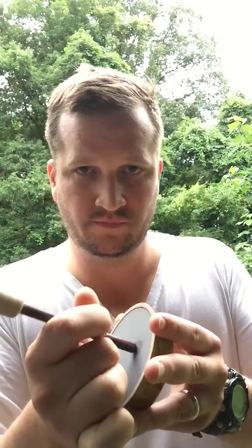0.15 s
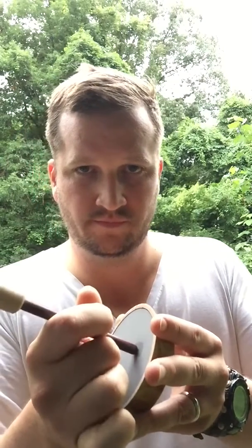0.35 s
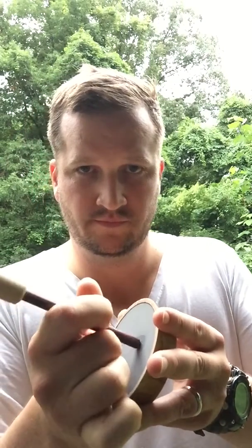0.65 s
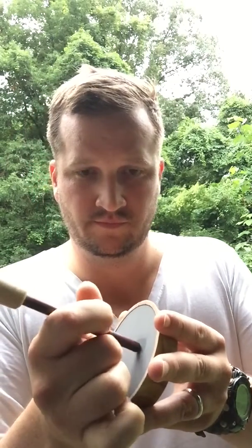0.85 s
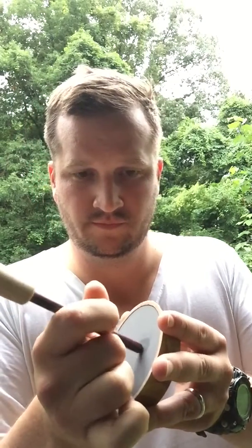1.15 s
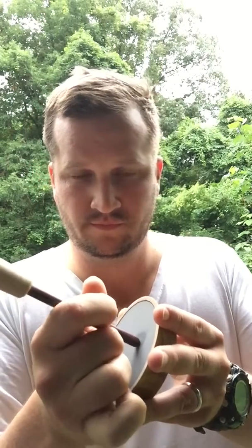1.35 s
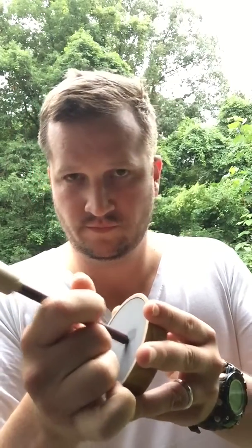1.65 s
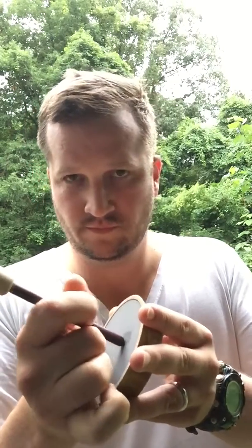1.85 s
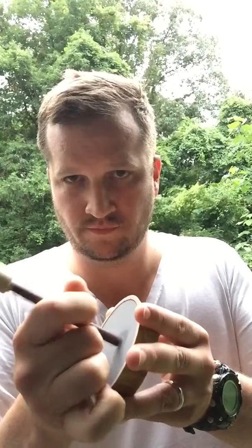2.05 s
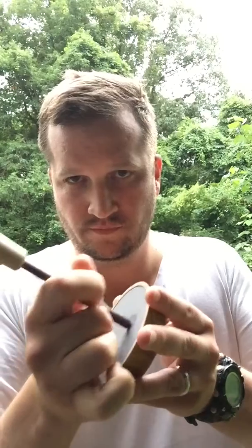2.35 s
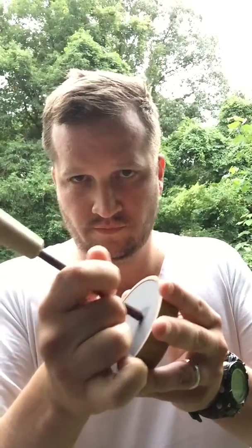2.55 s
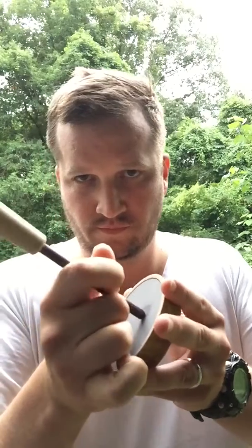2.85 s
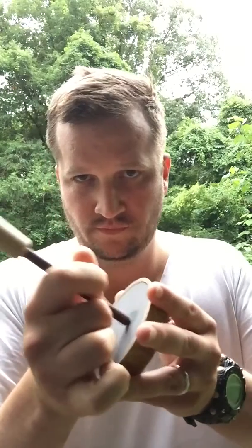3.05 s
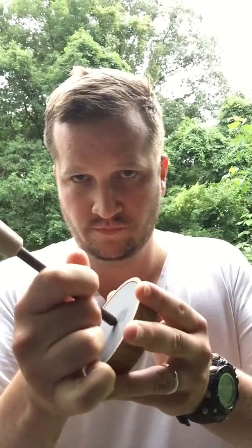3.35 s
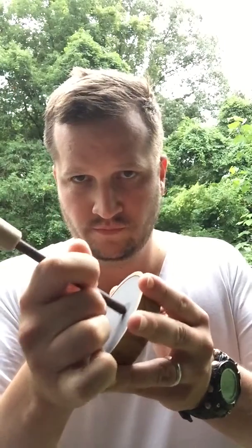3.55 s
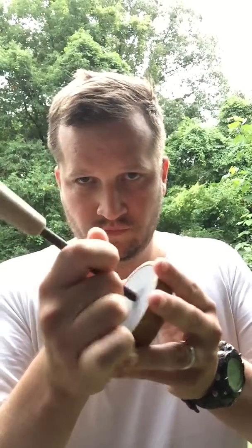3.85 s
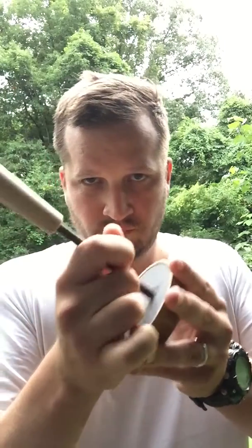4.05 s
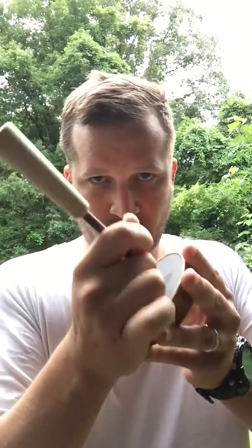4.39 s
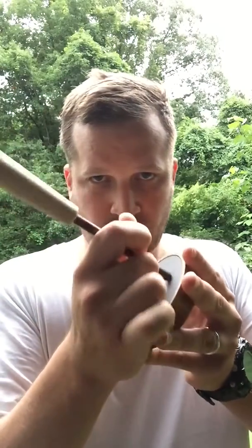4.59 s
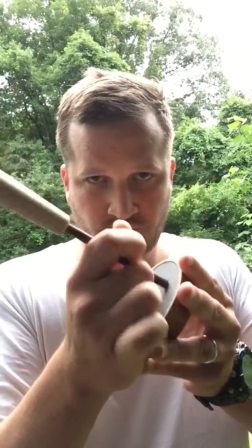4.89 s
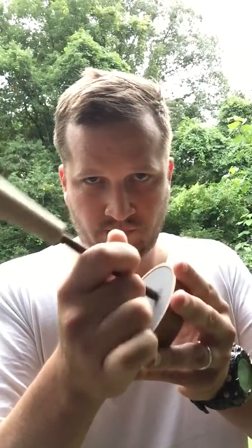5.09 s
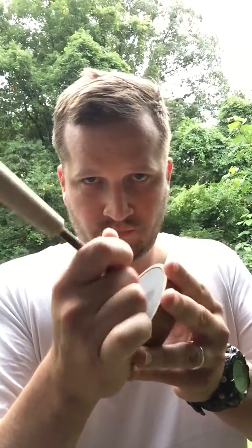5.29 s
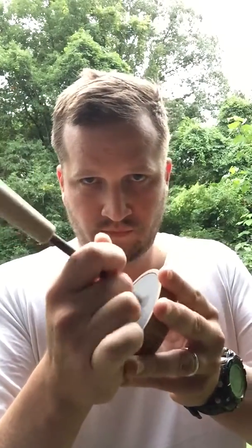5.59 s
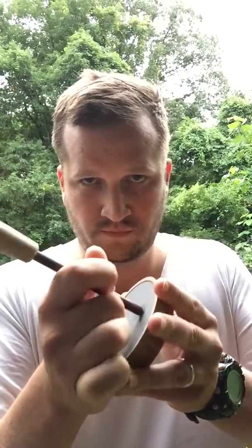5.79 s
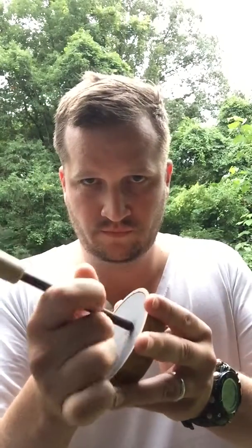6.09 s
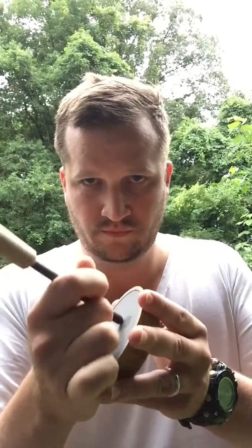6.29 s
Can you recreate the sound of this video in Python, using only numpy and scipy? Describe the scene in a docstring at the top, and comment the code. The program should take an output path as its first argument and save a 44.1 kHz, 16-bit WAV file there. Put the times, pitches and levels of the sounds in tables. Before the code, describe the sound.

A wooden striker scrapes a slate pot call close to the microphone, making turkey-like sounds outdoors. A brief yelp sounds right at the start. Short, sharp clucks follow at about 0.6, 0.8 and 1.1 seconds. From 1.7 to 2.7 seconds comes a quick run of seven more, easing slightly in level, then single clucks at 3.0, 3.4 and 4.0 seconds. Two softer yelps fall at 3.7 and 4.3 seconds. From 4.6 seconds to about 6.4, six loud yelps come evenly, about three a second, each a short clear whistle breaking into a lower, gritty rasp. Surrounding trees give every stroke a light echo and short tail. Fingers rub very faintly on the pot around 0.5 and 1.6 seconds. Thin, distant bird whistles are barely audible near the start and just after 4 seconds, over a faint low rumble and hiss.

```python
"""Slate pot call at a wood's edge

A wooden striker is scraped over the slate, close by. Its tip sticks and slips several hundred times
a second, and each slip rings the slate and its pot. Long strokes give yelps, a clear whistle that
breaks into a lower rasp; short hard ones give clucks. The trees scatter the sound, fingers rub
on the pot, and birds sing far off over a low rumble and a faint hiss."""
import sys
import numpy as np
from scipy import signal
from scipy.fft import rfft, irfft
from scipy.io import wavfile
from scipy.ndimage import uniform_filter1d

SR = 44100
rng = np.random.default_rng(int(sys.argv[2]) if len(sys.argv) > 2 else 0)


def generate_wav(signal):
    """Clip the signal to [-1, 1] and save it as 16-bit WAV at the path in sys.argv[1]."""
    frames = np.transpose(np.atleast_2d(signal))
    scaled = np.clip(frames, -1, 1) * 32767
    pcm = np.round(scaled).astype(np.int16)
    wavfile.write(sys.argv[1], SR, pcm)


N = 283563


def from_db(db):
    return 10 ** (np.asarray(db) / 20)


def unit_rms(x):
    return x / np.sqrt(np.mean(x ** 2) + 1e-20)


def butter(x, hz, kind, order=2):
    return signal.sosfilt(signal.butter(order, hz, kind, fs=SR, output="sos"), x)


def ramp(t, start, length):
    return np.clip((t - start) / length, 0, 1)


def blend(a, b, share):
    return a + (b - a) * share


def flutter(size, hz):
    """Low-passed noise, RMS 1."""
    return unit_rms(butter(rng.standard_normal(size), hz, "low"))


def add(out, start_s, sound):
    i = round(start_s * SR)
    low, high = max(i, 0), min(i + len(sound), N)
    out[low:high] += sound[low - i:high - i]


def resonance(x, hz, width_hz):
    """Two-pole resonator, peak gain 1."""
    r, w = np.exp(-np.pi * width_hz / SR), 2 * np.pi * hz / SR
    return signal.lfilter([2 * (1 - r) * np.sin(w)], [1, -2 * r * np.cos(w), r * r], x + 1e-18)


# Modes of slate, pot and striker: f/Hz, width/Hz, gain/dB
CALL_MODES = [(620, 84, -30.5), (1114, 63.0, -9.5), (1355.6, 93.8, -0.5), (1488.2, 115.6, 1.0),
              (1858.0, 117.6, 1.0), (2032.3, 122, -1.0), (2574, 163.0, -18.5), (3032, 258.0, -20.5),
              (3440, 238, -18.5), (4517.0, 386.0, -26.0), (4870, 214.0, -23.5), (5290.0, 200.0, -22.5),
              (5940, 317.0, -30.5), (6613, 322.0, -29.0), (8960, 830, -40.0), (13000, 1400, -46.0)]


def pot(force, low_hz=620, top_hz=11000):
    """The modes radiate with alternating signs; the small pot gives off little bass."""
    modes = sum((-1) ** k * from_db(db) * resonance(force, hz, width_hz)
                for k, (hz, width_hz, db) in enumerate(CALL_MODES))
    return butter(butter(modes, low_hz, "high", order=4), top_hz, "low")


def slips(hz, limp, chaos, weaken, lurch, lag_cycles=.04, jitter_cycles=.037, size_spread=.22):
    """One force pulse per slip. Limp delays and weakens every other one; chaos scatters them."""
    n = len(hz)
    cycles = np.cumsum(hz) / SR
    k = np.arange(1, int(cycles[-1]) - 1)
    limp, chaos = np.interp(k, cycles, limp), np.interp(k, cycles, chaos)
    time_noise, size_noise = rng.standard_normal((len(k), 2)).T
    alternation = limp * (-1) ** k
    slip_cycle = k + lag_cycles * alternation + jitter_cycles * chaos * time_noise
    threes = lurch * chaos ** 2 * (k % 3 - 1)   # sizes bunch in threes
    size = (1 - weaken * alternation) * np.exp(size_spread * chaos * size_noise + threes)
    position = np.interp(slip_cycle, cycles, np.arange(n))
    whole, part = position.astype(int), position % 1
    force = np.bincount(whole, size * (1 - part), n + 1) + np.bincount(whole + 1, size * part, n + 1)
    return force[:n]


def scrape(hz, level, limp, chaos, bite_db, grit_db, weaken, lurch, sizzle_db, grit_hz=3500):
    """Friction drives the pot to a level. A biting tip adds treble; the slate's grain adds grit."""
    force = slips(hz, limp, chaos, weaken, lurch)
    swing = np.sqrt(uniform_filter1d(pot(force) ** 2, size=220) + 1e-12)
    force = force * level / np.maximum(swing, .5 * np.median(swing))
    sliding = signal.lfilter([.1], [1, -.9], force)   # short tail on each slip
    grit = from_db(grit_db) * chaos * sliding * rng.standard_normal(len(hz))
    sizzle = from_db(sizzle_db) * butter(grit, [7000, 14000], "band")
    sound = pot(force + butter(grit, grit_hz, "high", order=1)) + sizzle
    body = signal.sosfiltfilt(signal.butter(4, 2800, fs=SR, output="sos"), sound)
    return body + from_db(bite_db) * (sound - body)


def thump(level, chaos, knock_db, crackle_db, crackle_hz=70):
    """Hard uneven slips add a knock near 370 Hz and a low crackle."""
    jolt = level ** 2 * chaos * rng.standard_normal(len(level))
    knock = butter(resonance(jolt, hz=370, width_hz=70), [290, 420], "band")
    return from_db(knock_db) * knock + from_db(crackle_db) * butter(jolt, crackle_hz, "low", order=1)


def ring_down(t, db, hz, t60_s=.05, rise_s=.0019):
    """One mode ringing freely from t = 0."""
    t = np.maximum(t, 0)
    return from_db(db - 60 * t / t60_s) * (1 - np.exp(-t / rise_s)) * np.sin(2 * np.pi * hz * t)


USUAL_STROKE_DB = -9
SKATE_DB, GRIP_S = -11, .012   # skating level re whistle; time the tip takes to grip


def yelp_pitch(t, start, grip, broken, along, end, skate_hz, whistle_hz, pressure,
               rasp_hz=712, pressed_drop_hz=46.1, lowest_at=.72, hook_hz=80, hook_s=.008):
    """The slip rate glides to the whistle, drops at the break, sags and hooks up at the end."""
    whistle = blend(1.02 * skate_hz, whistle_hz, ramp(t, start, grip - start + .0011) ** 2)
    sag = 1 + .095 * np.cos(np.pi / 2 * along / lowest_at) ** 2
    hook = hook_hz * np.exp(np.minimum((t - end) / hook_s, 1))
    rasp = (rasp_hz - pressed_drop_hz * pressure) * sag + hook
    waver = blend(.018, .009, ramp(t, grip, GRIP_S))   # steadier once gripped
    return blend(whistle, rasp, broken) * (1 + waver * flutter(len(t), hz=50))


def yelp_level(t, start, gripped, broken, along, end, whistle_db, pressure,
               attack_s=.015, chatter_db=2, rasp_db=-10.7, ease_s=.029, ease_db=7, lift_db_per_s=2500.5):
    """Quiet chattering skate, steady whistle, then a rasp that fades as the hand eases and lifts."""
    opening_db = whistle_db + (SKATE_DB + chatter_db * flutter(len(t), hz=110)) * (1 - gripped)
    carryover_db = .5 * (whistle_db - USUAL_STROKE_DB) * (1 - along) ** 2
    light_fade_db = 8.5 * (1 - pressure) * along
    stroke_db = blend(opening_db, rasp_db + carryover_db - light_fade_db, broken)
    ending_db = ease_db * ramp(t, end - ease_s, ease_s) ** 2 + lift_db_per_s * np.maximum(t - end, 0)
    return ramp(t, start - .0037, attack_s) ** 2 * from_db(stroke_db - ending_db)


# Tip contact (rows: skate, whistle, rasp ends, rasp middle): scatter/1, limp/1, bite/dB
TIP_CONTACT = [(0.3, 0.01, -13.5), (.3, 0.03, -1), (.38, .1, -1.5), (.9, 0.4, 3.5)]
# Long strokes: start t/s, grip t/s, break t/s, end t/s,
# skate f/Hz, whistle f/Hz, whistle level/dB, pressure after the break/1
YELP_STROKES = [(-0.05, -0.03, 0.02, 0.092, 1100, 969, -9.4, .15),
                (3.745, 3.765, 3.796, 3.893, 993, 965, -19.5, .62),
                (4.284, 4.311, 4.324, 4.452, 1023, 985, -17, .62),
                (4.636, 4.659, 4.705, 4.788, 1068, 964, -9.0, .62),
                (4.934, 4.961, 5.011, 5.085, 1126, 959, -7.8, .25),
                (5.243, 5.263, 5.305, 5.376, 1067, 960, -9.0, .82),
                (5.548, 5.579, 5.628, 5.699, 1163, 982, -10.0, .35),
                (5.88, 5.904, 5.934, 6.021, 1122, 957, -7.8, .85),
                (6.225, 6.262, 6.293, 6.371, 1101, 961, -10.9, .75)]


def yelp(start, grip, break_at, end, skate_hz, whistle_hz, whistle_db, pressure):
    """The tip skates, grips into a whistle, breaks to a slower limping slip, speeds up as it lifts."""
    t = np.arange(start - .02, end + .05, 1 / SR) + .0018   # force leads the pot's swing
    effort_db = whistle_db - USUAL_STROKE_DB
    break_s = .005 / from_db(effort_db)   # soft strokes break more gradually
    gripped = ramp(t, grip - GRIP_S, GRIP_S) ** 2
    broken = ramp(t, break_at - break_s / 2, break_s)
    along = ramp(t, break_at, end - break_at)   # progress through the rasp
    hz = yelp_pitch(t, start, grip, broken, along, end, skate_hz, whistle_hz, pressure)
    level = yelp_level(t, start, gripped, broken, along, end, whistle_db, pressure)

    skating, whistling, rasping, digging = np.array(TIP_CONTACT)[:, :, None]
    opening_contact = blend(skating, whistling, gripped)
    rasp_contact = blend(rasping, digging, np.sin(np.pi * along))
    scatter, limp, bite_db = blend(opening_contact, rasp_contact, broken)
    limp = limp + 1.4 * np.exp(-((along - .3) / .15) ** 2) * broken   # strongest early in the rasp
    # Harder strokes grate more and start brighter; the bite flutters over the grain.
    chaos = scatter * (.42 + .42 * pressure) * from_db(.5 * effort_db)
    bite_db = bite_db + 1.4 * effort_db * (1 - along) ** 2 + 1.65 * flutter(len(t), hz=60)
    voice = scrape(hz, level, limp, chaos, bite_db,
                   grit_db=5.5, weaken=.38, lurch=.86, sizzle_db=-38, grit_hz=6000)

    # While skating, the striker swings smoothly at the slip rate.
    skate_level = np.minimum(level, from_db(whistle_db + SKATE_DB + 2)) * (1 - gripped)
    skate = skate_level * np.sin(2 * np.pi * np.cumsum(hz) / SR)
    striker = ring_down(t - end + .0013, db=-27, hz=990)
    return voice + skate + striker + thump(level, chaos, knock_db=-8.5, crackle_db=-4.5)


# Tree scatter: low f/Hz, high f/Hz, early gain/dB, far echo gain/dB, late gain/dB, late T60/s
TREE_SCATTER = [(500, 1400, -28.5, -38, -40, 1), (1300, 2180, -27.5, -41, -39, 0.96),
                (2400, 8000, -25, -39.5, -36, .6), (8000, 15000, -29, -25.5, -46.5, .45)]


def woods(x, early_t60_s=.2, onset_s=.0099, echo_s=.041, echo_db=-41, far_echo_s=.089, smear_s=.0057):
    """Near surfaces answer, a dull and a bright echo follow; trees leave a tail blurred in pitch."""
    t = np.arange(SR) / SR
    reflections, tail = np.zeros((2, SR))
    onset = 1 - np.exp(-t / onset_s)
    for low_hz, high_hz, early_db, far_echo_db, late_db, t60_s in TREE_SCATTER:
        for response, db, shape in (
                (reflections, early_db, onset * from_db(-60 * t / early_t60_s)),
                (reflections, far_echo_db, np.exp(-np.abs(t - far_echo_s) / (2 * smear_s))),
                (tail, late_db, onset * from_db(-60 * t / t60_s))):
            noise = butter(rng.standard_normal(SR), [low_hz, high_hz], "band")
            response += from_db(db) * noise * shape / np.sqrt(np.sum(shape ** 2))
    echo_shape = (t > echo_s) * np.exp(-np.abs(t - echo_s) / smear_s)
    dull_echo = butter(rng.standard_normal(SR), 2500, "low") * echo_shape
    reflections += from_db(echo_db) * dull_echo / np.sqrt(np.sum(dull_echo ** 2))
    blurred = x * flutter(N, hz=110)
    return (signal.fftconvolve(x, reflections) + signal.fftconvolve(blurred, tail))[:N]


# Outdoor noise spectrum: f/Hz, relative density/dB
AIR_SPECTRUM = [(20, -43.5), (55, 0), (115, 0.5), (200, -10), (320, -15.5), (520, -22), (900, -21.5),
                (2500, -23), (5000, -27), (9000, -35.5), (15000, -42)]
# Rumble swell: t/s, relative level/dB
RUMBLE_SWELL = [(0.0, -61), (0.21, -60.5), (0.53, -57), (1.34, -60), (1.63, -57.5), (2.44, -66),
                (4.78, -59.5), (6.43, -69)]


def air(rumble_gain_db=1, hiss_gain_db=-69.5, split_hz=450):
    """A slowly swelling rumble under a steady faint hiss."""
    hz, db = np.transpose(AIR_SPECTRUM)
    bin_hz = np.arange(N // 2 + 1) * SR / N
    colour = from_db(np.interp(np.log(bin_hz + 1), np.log(hz), db))
    noise = unit_rms(irfft(rfft(rng.standard_normal(N)) * colour, N))
    swell = from_db(rumble_gain_db + np.interp(np.arange(N) / SR, *np.transpose(RUMBLE_SWELL)))
    hiss = from_db(hiss_gain_db) * butter(noise, split_hz, "high")
    return swell * butter(noise, split_hz, "low") - hiss


# Distant whistles: start t/s, end t/s, start f/Hz, end f/Hz, level/dB
BIRD_WHISTLES = [(0.118, 0.474, 1930, 1926, -64), (0.282, .56, 2660, 2530, -73),
                 (4.087, 4.32, 3900, 3770, -69.5), (4.47, 4.64, 2960, 2850, -67)]


def birds():
    """Thin gliding whistles, blurred by distance."""
    out = np.zeros(N)
    for start, end, start_hz, end_hz, db in BIRD_WHISTLES:
        along = np.linspace(0, 1, round((end - start) * SR))
        arch = np.sqrt(4 * along * (1 - along))
        blur = 1 + .74 * flutter(len(along), hz=40)
        tone = np.sin(2 * np.pi * np.cumsum(blend(start_hz, end_hz, along)) / SR)
        add(out, start, from_db(db) * arch * blur * tone)
    return out


# Shifts of hold on the pot: centre t/s, half length/s, level/dB
HOLD_SHIFTS = [(0.522, .16, -60.5), (1.56, 0.18, -61)]


def finger_rub(band_hz=(50, 1500), knee_hz=170):
    """Fingers rub on the pot in soft, dull swells."""
    t = np.arange(N) / SR
    rub = butter(butter(rng.standard_normal(N), band_hz, "band"), knee_hz, "low", order=1)
    swells = sum(from_db(db) * np.exp(-((t - centre) / half) ** 2) for centre, half, db in HOLD_SHIFTS)
    return unit_rms(rub) * swells


# Short hard strokes: t/s, length/s, level/dB, base slip f/Hz
CLUCK_STROKES = [(0.613, 0.025, -5.5, 724.6), (0.807, 0.029, -6, 709), (1.135, 0.025, -7, 730.8),
                 (1.665, 0.027, -6, 709), (1.827, 0.028, -6.5, 701.5), (1.989, 0.026, -7.5, 704.7),
                 (2.147, 0.027, -8, 698), (2.325, 0.026, -9, 711), (2.503, 0.031, -9.5, 702),
                 (2.734, 0.028, -9, 712.5), (3.033, 0.028, -8, 710.6), (3.362, 0.026, -7, 706),
                 (4.017, 0.033, -7, 675)]


def cluck(length_s, level_db, slip_hz,
          lead_s=.0036, attack_s=.0042, settle_s=.0054, ease_s=.0036, sag_db=1.57, lift_db_per_s=2100):
    """The pressed tip tears loose, judders, settles, and judders again as it lifts with rising pitch."""
    t = np.arange(0, length_s + .07, 1 / SR) - .008
    tear = .3 * np.exp(-np.maximum(t + lead_s, 0) / .003)
    hook = .19 * ramp(t, 0, length_s + ease_s) ** 2.5
    hz = slip_hz * (1 + tear + hook)
    fall_db = sag_db * ramp(t, 0, length_s) + lift_db_per_s * np.maximum(t - length_s + ease_s, 0)
    level = ramp(t, -lead_s, attack_s) ** 2 * from_db(level_db + 1 - fall_db)
    settled = ramp(t, .42 * length_s, settle_s) - ramp(t, length_s - ease_s / 2, settle_s)
    chaos = blend(1.09, .2, settled)
    limp = .45 * chaos
    bite_db = blend(-7, 4, ramp(t, -lead_s, .0064)) + .27 * (level_db - USUAL_STROKE_DB)
    voice = scrape(hz, level, limp, chaos, bite_db, grit_db=3, weaken=.65, lurch=.2, sizzle_db=-42)

    # The jolt rings two lightly damped slate modes; the striker rings at tear and at lift.
    slate = (ring_down(t, db=level_db - 34.5, hz=1460, t60_s=.47)
             + ring_down(t, db=level_db - 40.5, hz=5170, t60_s=.34))
    striker = (ring_down(t + lead_s / 3, db=level_db - 3.5, hz=960, t60_s=.02)
               + ring_down(t - length_s + .003, db=level_db - 8, hz=1019, t60_s=.055))
    return voice + slate + striker + thump(level, chaos, knock_db=-4.5, crackle_db=-2.5, crackle_hz=32.2)


def scene():
    """Mono mix of the call, its echoes and the background."""
    call = np.zeros(N)
    for start, *stroke in YELP_STROKES:
        add(call, start - .02, yelp(start, *stroke))   # 20 ms lead-in
    for start, *stroke in CLUCK_STROKES:
        add(call, start - .008, cluck(*stroke))   # 8 ms lead-in
    return (call + woods(call) + finger_rub() + birds() + air())[None]


def record(dry, ceiling=.72, cutoff_hz=15800):
    """Soft clip, then a steep low-pass."""
    rounded = dry / (1 + (dry / ceiling) ** 8) ** (1 / 8)
    return signal.sosfilt(signal.ellip(10, .1, 80, cutoff_hz, fs=SR, output="sos"), rounded)


dry = scene()
out = record(dry)
generate_wav(out)
```